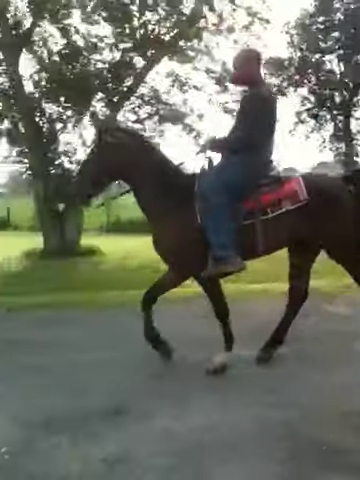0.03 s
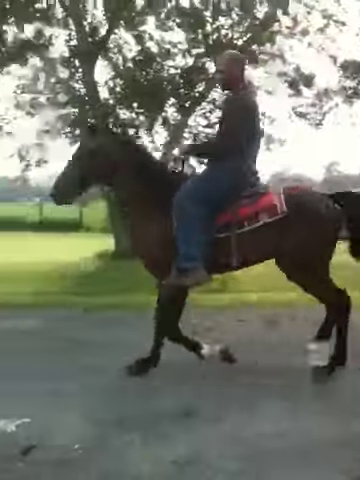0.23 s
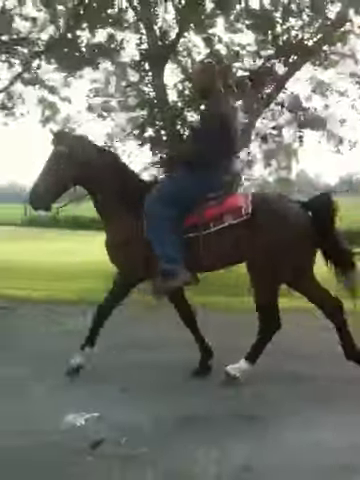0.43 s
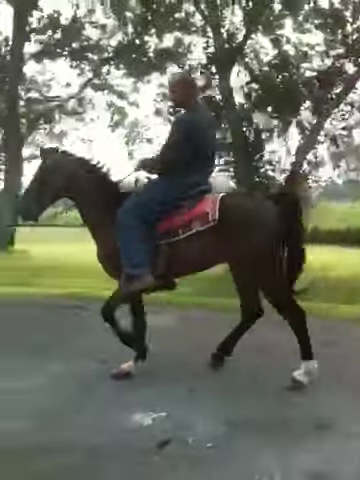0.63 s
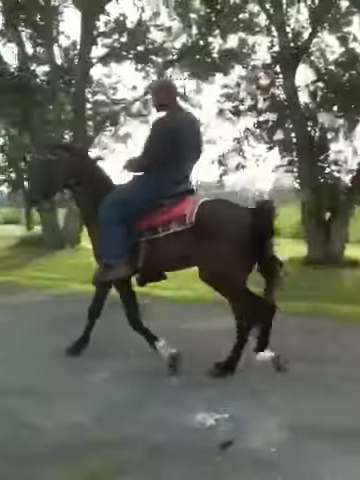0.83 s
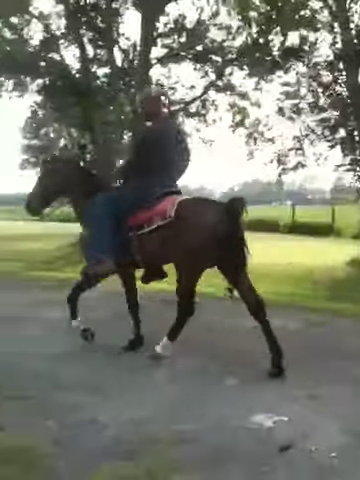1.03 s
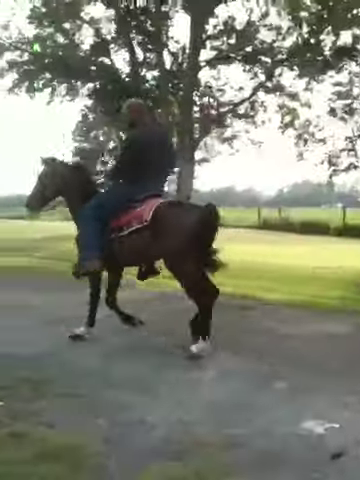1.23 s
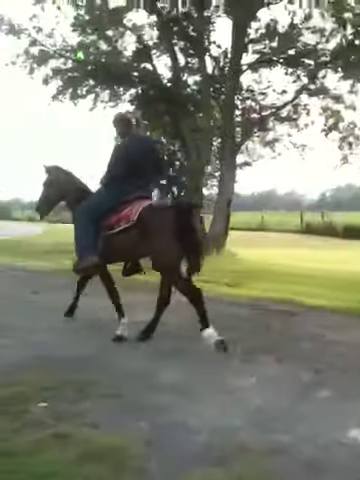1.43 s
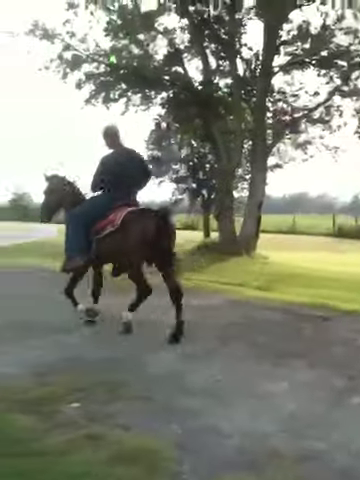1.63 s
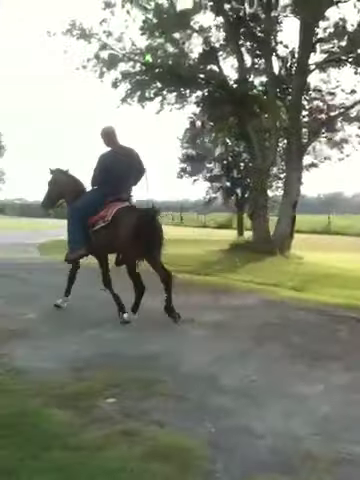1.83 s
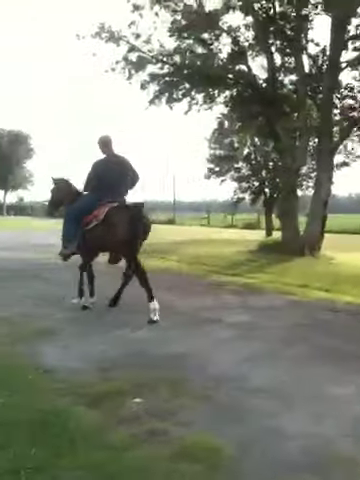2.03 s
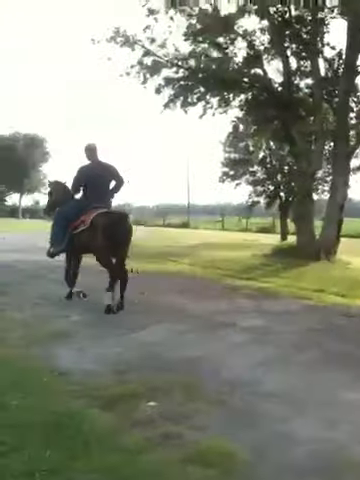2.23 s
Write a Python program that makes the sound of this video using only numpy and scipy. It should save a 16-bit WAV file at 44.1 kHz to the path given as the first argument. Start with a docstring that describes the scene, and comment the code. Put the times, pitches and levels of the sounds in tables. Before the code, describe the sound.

A horse walks past on a gritty paved drive and moves away, its hooves clopping unevenly, scraping grit and flicking small stones. One early step lands hardest. A low rumble and light hiss sit behind, outdoors.

```python
"""A ridden horse walks past on a gritty paved drive and moves away, outdoors.
Each hoof lands in one or a few hollow knocks, grinds the grit under it and flicks small stones.
In the hardest step the shoe bites on stone and rings. The ground and the trees add faint echoes.
Behind are soft low thumps, a rumble with a steady hum, a distant rushing and a light hiss."""
import sys
import numpy as np
from scipy import signal
from scipy.fft import rfft, irfft, next_fast_len
from scipy.io import wavfile

SR = 44100
rng = np.random.default_rng(int(sys.argv[2]) if len(sys.argv) > 2 else 0)


def master_out(mix):
    """Clip the mix to full scale and print it as 16-bit PCM to the path in sys.argv[1]."""
    frames = np.transpose(np.atleast_2d(mix))
    ceiling = np.clip(frames, -1, 1)
    pcm = np.round(ceiling * 32767).astype(np.int16)
    wavfile.write(sys.argv[1], SR, pcm)


N = 101429
T = np.arange(N) / SR
HIT_T = T[:SR // 8]   # the clock of one short hit, in seconds

# a hoof grinds over grit: t/s, length/s, level/dB, hoof ring against the grit/dB, treble/dB
SCUFFS = [(0.0616, 0.0037, -44.5, -16, 1.5), (0.115, 0.0037, -47, -8, -4), (0.134, 0.012, -45, -18, 4),
          (0.2, 0.0085, -47.5, 2, 0), (0.247, 0.011, -48, -2, -12), (0.317, 0.0059, -43, -30, 3.5),
          (0.444, 0.037, -35, -1, 0), (0.483, 0.018, -42, -5, -5), (0.551, 0.051, -52, -8, 4.5),
          (0.816, 0.014, -45, -13, -3), (0.915, 0.047, -55, 1.5, 1), (1.04, 0.064, -61, -23, 6),
          (1.119, 0.028, -39.5, -3.5, 2.5), (1.151, 0.022, -37.5, -6.5, 3.5), (1.252, 0.014, -37, -15, 6),
          (1.483, 0.033, -57.5, -17, -3), (1.605, 0.018, -50, -9, 1.5), (1.825, 0.043, -43.5, -14, 4.5),
          (1.97, 0.045, -60, -20, 2.5), (2.189, 0.019, -51, -23, -1)]
# the tone of crushed grit: f/Hz, level/dB
GRIT_TONE = [(60, -56), (200, 7.5), (480, 15), (700, 4), (1000, 9), (1900, 8.5), (2350, 0.5), (2800, 7.5),
             (3500, 3.5), (5000, 3), (7000, -1.5), (9300, -3.5), (10500, -9), (16000, -16)]


def from_db(db):
    """Turn decibels into a number to multiply by."""
    return 10 ** (np.asarray(db) / 20)


def rms_one(x):
    """Scale a sound so that its average strength (rms) is 1."""
    return x / np.sqrt(np.mean(x ** 2) + 1e-20)


def fade(t60):
    """A curve that dies away by 60 dB in t60 seconds."""
    return from_db(-60 * HIT_T / t60)


def add(out, start_s, x):
    """Mix a short sound in at its start time."""
    i = max(int(start_s * SR), 0)
    out[i:i + len(x)] += x[:max(N - i, 0)]


def shaped(x, envelope):
    """Make a sound follow a loudness curve and carry that curve's energy."""
    return envelope * x * np.sqrt(np.sum(envelope ** 2) / np.sum((envelope * x) ** 2))


def colour(x, tone):
    """Give a sound the tone drawn by points of f/Hz, level/dB; rms 1."""
    hz, db = np.transpose(tone)
    size = 2 * next_fast_len(x.shape[-1])
    f = np.maximum(np.fft.rfftfreq(size, 1 / SR), 1)
    gain = from_db(np.interp(np.log(f), np.log(hz), db))
    # build the filter so that it never rings before the sound arrives
    cepstrum = irfft(np.log(gain))
    cepstrum[1:size // 2] *= 2
    cepstrum[size // 2 + 1:] = 0
    filtered = irfft(rfft(x, size) * np.exp(rfft(cepstrum)))
    return rms_one(filtered[..., :x.shape[-1]])


def resonate(x, hz, width_hz):
    """Make a sound ring around one pitch, longer if the width is narrow; rms 1."""
    r = np.exp(-np.pi * width_hz / SR)
    return rms_one(signal.lfilter([1, 0, -1], [1, -2 * r * np.cos(2 * np.pi * hz / SR), r * r], x))


def grains(shape, per_s, spread_db):
    """Random clicks of uneven size and sign."""
    chance, size, sign = np.moveaxis(rng.random((*shape, 3)), -1, 0)
    strength = from_db(spread_db * np.minimum(-np.log(1 - size), 4))
    return (chance < per_s / SR) * strength * np.sign(sign - .5)


def crunch(x):
    """Give a sound the tone of grit, which rings briefly in the horseshoe; rms 1."""
    # the rings of the shoe: f/Hz, width/Hz, level/dB
    shoe_rings = [(1920, 720, -9), (2550, 480, -18.5), (4037, 120, -15.5), (5150, 440, -15.5),
                  (6800, 550, -12.5), (7870, 490, -11.5)]
    grit = colour(x, GRIT_TONE)
    return rms_one(grit + sum(from_db(db) * resonate(grit, hz, width) for hz, width, db in shoe_rings))


def far_note(hz=1423, width_hz=240, peak_s=.75, swell_s=.18):
    """A faint, rough far-off note swells and fades."""
    note = resonate(resonate(rng.standard_normal(N), hz, width_hz), hz, width_hz)
    return np.exp(-.5 * ((T - peak_s) / swell_s) ** 2) * note


def loose_grit(settle_s=.08, crumble_s=.0017):
    """After each scuff, lone grains fall back and crumble in tiny bursts; rms 1."""
    falling = sum((T > start) * np.exp(-np.abs(T - start) / settle_s) for start, *_ in SCUFFS)
    pops = np.abs(grains((N,), per_s=240 * falling, spread_db=4.5))
    bursts = signal.lfilter([1], [1, -np.exp(-1 / (crumble_s * SR))], pops + 1e-18)
    return crunch(bursts * rng.standard_normal(N))


def background(hum_hz=114.2):
    """Rumble, a steady hum, distant rushing, hiss and the ticking of loose grit."""
    # slow drift, before each layer's own gain below: t/s, rumble/dB, rushing/dB, hiss and grit/dB
    drift = [(0.0, -54.5, -54, -51.5), (0.97, -51, -52, -55.5), (2.3, -52, -52, -52.5)]
    # the tones of the three noises: f/Hz, level/dB
    rumble_tone = [(25, -60), (50, -24), (80, -10.5), (130, 1.5), (250, 0), (340, -5.5), (480, -15.5),
                   (700, -19), (1200, -22), (4000, -45)]
    rushing_tone = [(300, -57), (750, -24), (1050, -6.5), (1300, -3.5), (1600, -9), (2100, -23),
                    (2650, -14), (3600, -34.5), (8000, -82)]
    hiss_tone = [(1000, 9.5), (3000, 3.5), (8000, -4.5), (11000, -5), (16000, -49)]
    times, *levels = np.transpose(drift)
    rumble_gain, rushing_gain, hiss_gain = [from_db(np.interp(T, times, db)) for db in levels]
    noise = rng.standard_normal((3, N))
    rumble = from_db(1.5) * colour(noise[0], rumble_tone)
    rushing = from_db(-2) * (colour(noise[1], rushing_tone) + from_db(3) * far_note())
    hiss = from_db(-9) * colour(noise[2], hiss_tone)
    ticking = from_db(-6.5) * loose_grit()
    hum = from_db(-56.5) * np.sqrt(2) * np.sin(2 * np.pi * hum_hz * T)
    return rumble_gain * rumble + rushing_gain * rushing + hiss_gain * (hiss + ticking) + hum


def thumps(rise_s=.0052, shudder_s=.013, width_hz=153):
    """Soft thumps: a low note swells and dies away, followed by a rough shudder."""
    # each thump: t/s, level/dB, f/Hz
    low_thumps = [(0.621, -40.5, 191), (0.758, -33, 158), (0.946, -33.5, 176), (1.109, -35, 153),
                  (1.181, -37.5, 147), (1.463, -39, 148), (1.522, -35, 164), (1.666, -37.5, 169),
                  (1.89, -38, 148), (2.195, -43.5, 184)]
    out = np.zeros(N)
    swell, late_swell = [HIT_T / peak_s * np.exp(1 - HIT_T / peak_s) for peak_s in (rise_s, shudder_s)]
    for (start, db, hz), noise in zip(low_thumps, rng.standard_normal((len(low_thumps), len(HIT_T)))):
        note = swell * np.sin(2 * np.pi * hz * HIT_T)
        low_noise = resonate(resonate(noise, hz, width_hz), hz, width_hz)
        add(out, start, from_db(db) * (note + from_db(-13) * shaped(low_noise, late_swell)))
    return out


def echoes(x, cutoff_hz=6300):
    """Sound bounces back, faint and dull, from around the drive."""
    # the nearby ground, then the trees: level/dB, fade time/s
    bounces = [(-15, .06), (-14.5, .42)]
    out = 0
    for db, t60 in bounces:
        tail = rng.standard_normal(SR) * from_db(-60 * T[:SR] / t60)
        tail /= np.sqrt(np.sum(tail ** 2))
        out = out + from_db(db) * signal.fftconvolve(x, tail)[:N]
    return signal.sosfilt(signal.butter(1, cutoff_hz, fs=SR, output="sos"), out)


def stones():
    """Small flicked stones make short bright snaps, each with a lower ring."""
    # each snap: t/s, level before halving/dB, f/Hz, low ring against the snap/dB
    snaps = [(0.2329, -37, 8450, 0), (.271, -32.5, 8700, -25), (0.3164, -28.5, 10600, -0.5),
             (0.5802, -27.5, 3500, -1.5), (0.917, -28, 4750, 5), (0.947, -29.5, 4900, 0),
             (0.9631, -21.5, 5140, 1), (1.027, -33, 6100, -15), (1.046, -35.5, 5330, 0),
             (1.126, -33, 7800, -6), (1.13, -27.5, 7900, 9.5), (1.2501, -29, 7240, -14),
             (1.267, -23, 6900, -2), (1.287, -31, 7400, 1), (1.41, -37.5, 8150, -6), (1.44, -41, 5400, 7.5),
             (1.6126, -33, 7700, -24), (1.955, -27, 3700, 3.5), (2.2758, -32.5, 4400, -6)]
    out = np.zeros(N)
    bursts = colour(rng.standard_normal((len(snaps), len(HIT_T))), GRIT_TONE)
    for (start, db, hz, ring_db), burst in zip(snaps, bursts):
        snap = resonate(burst, hz, width_hz=1700)
        low_ring = from_db(ring_db) * resonate(burst, hz=2050, width_hz=450)
        add(out, start, .5 * from_db(db) * fade(t60=.011) * (snap + low_ring))
    return out


def clinks(ring_hz=(2720, 3040, 3330)):
    """The edge of the shoe bites on stone and rings briefly."""
    # the bites in the hardest step: t/s, level/dB
    bites = [(0.4442, -35), (0.4519, -26), (.466, -31.5)]
    out = np.zeros(N)
    for start, db in bites:
        ring = sum(np.sin(2 * np.pi * (hz * HIT_T + rng.random())) for hz in ring_hz)
        add(out, start, from_db(db) * fade(t60=.016) * ring)
    return out


def clumps(clump_s=.0022, spread_db=3.6):
    """Grit gives way in clumps, so its loudness swings quickly at random."""
    steps = rng.standard_normal(len(HIT_T))
    return from_db(spread_db * np.interp(HIT_T / clump_s, np.arange(len(steps)), steps))


def scuffs(rise_s=.0013, release_s=.0017, treble_from_hz=2960, treble_full_hz=5560):
    """A sliding hoof crushes many grains, which keep it ringing; finer grit is brighter."""
    out = np.zeros(N)
    all_clicks = grains((len(SCUFFS), len(HIT_T)), per_s=3200, spread_db=3.6)
    for (start, length, db, ring_db, treble_db), clicks in zip(SCUFFS, all_clicks):
        press = (1 - np.exp(-HIT_T / rise_s)) * np.exp(-np.maximum(HIT_T - length, 0) / release_s)
        grit = colour(crunch(clicks * clumps()), [(treble_from_hz, 0), (treble_full_hz, treble_db)])
        ring = resonate(grit, hz=1020, width_hz=175)
        add(out, start, from_db(db) * (shaped(grit, press) + from_db(ring_db) * shaped(ring, press)))
    return out


def knocks(contact_s=.00089, push_hz=380, spread_db=1.5):
    """Each landing rings the hollow hoof, pushes dully on the ground and cracks the grit."""
    # each landing: t/s, level/dB, f/Hz, relative crack level before halving/dB, ring length factor
    landings = [(0.1994, -21, 1108, -15, 1), (0.25, -22, 1696, -3, 1), (0.2699, -26.5, 1160, -7, 1),
                (0.281, -23, 1090, 0, .7), (0.4411, -20.5, 1310, -10, 1.2), (.451, -1, 970, -11, .6),
                (0.464, -18.5, 1120, -18, 1.5), (.494, -28, 980, 1, 1.2), (0.7545, -28, 520, -19, .7),
                (0.7563, -28, 1190, -11, .8), (0.82, -28, 1050, -11, 1), (0.867, -20.5, 1063, -4, .9),
                (1.1336, -18.5, 1023, -5.5, 1.8), (1.1459, -19, 967, -30, 1), (1.152, -20.5, 1031, 4, 1.5),
                (1.2700, -15, 986, -2.5, .5), (1.506, -13.5, 1030, -11.5, .8),
                (1.544, -35.5, 1040, -5, 1.2), (1.619, -33, 1100, -6, 1.2), (1.829, -26, 1004, 2, 1),
                (1.837, -14.5, 997, -2.5, 1), (1.8593, -27, 906, -20, 1.8), (2.122, -23, 965, -20.5, .7),
                (2.1916, -24.5, 1046, -32, .7), (2.228, -27, 1024, -4.5, 1.1)]
    # the notes a hoof rings with: multiple of its pitch, level/dB, fade time/s
    hoof_notes = [(0.868, -15, 0.033), (0.996, -2.5, 0.021), (1.2, -18.5, 0.036), (1.55, -21, 0.033),
                  (1.95, -19, 0.014), (2.8, -41.5, 0.0037)]
    out = np.zeros(N)
    cracks = crunch(rng.standard_normal((len(landings), len(HIT_T))))
    strengths = from_db(rng.normal(0, spread_db, (len(landings), len(hoof_notes))))
    onset = 1 - np.exp(-HIT_T / contact_s)
    push = from_db(-29) * fade(t60=.011) * np.sin(2 * np.pi * push_hz * HIT_T)
    for (start, db, hz, crack_db, stretch), grit, strength in zip(landings, cracks, strengths):
        ring = 0
        for i, (multiple, note_db, t60) in enumerate(hoof_notes):
            note = (-1) ** i * np.sin(2 * np.pi * hz * multiple * HIT_T)   # every other one is flipped
            ring += strength[i] * from_db(note_db) * fade(t60 * stretch) * note
        crack = .5 * from_db(crack_db) * fade(t60=.016) * grit
        add(out, start, from_db(db) * onset * (ring + push + crack))
    return out


def scene():
    """The hooves, their echoes and the outdoor background, in one channel."""
    hooves = knocks() + scuffs() + stones() + clinks()
    return (hooves + echoes(hooves) + thumps() + background())[None]


def record(dry):
    """The very highest treble is cut off steeply."""
    cutoff_hz = 16200
    return signal.sosfiltfilt(signal.ellip(10, .05, 60, cutoff_hz, fs=SR, output="sos"), dry)


dry = scene()
out = record(dry)
master_out(out)
```